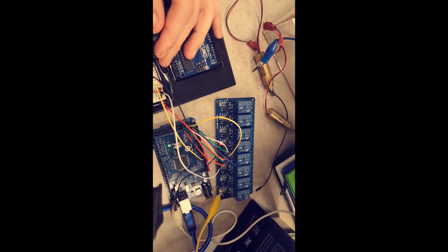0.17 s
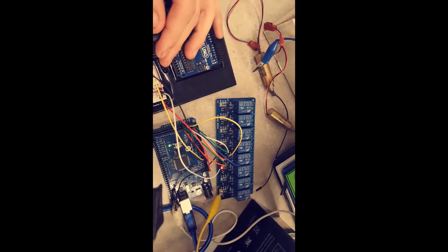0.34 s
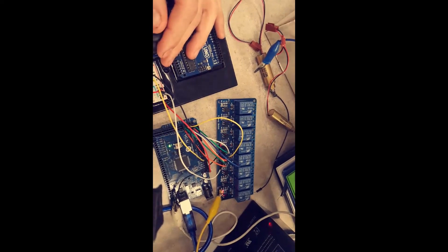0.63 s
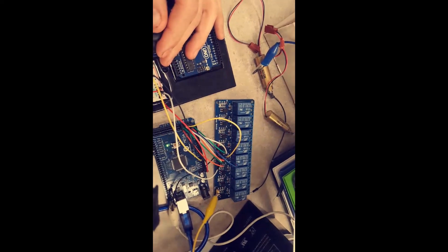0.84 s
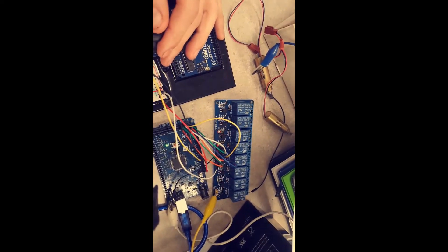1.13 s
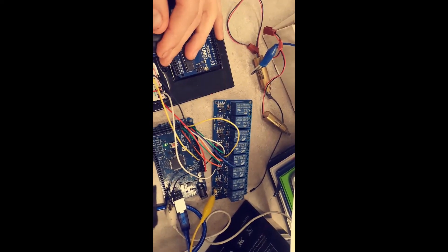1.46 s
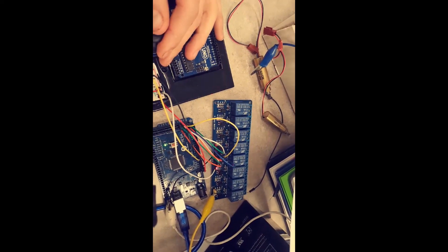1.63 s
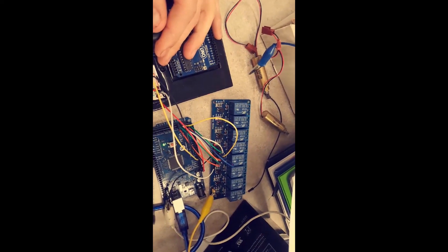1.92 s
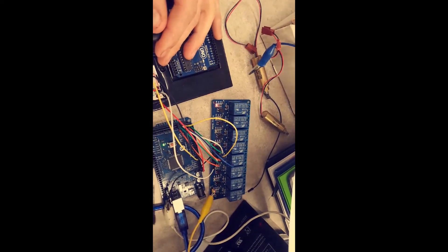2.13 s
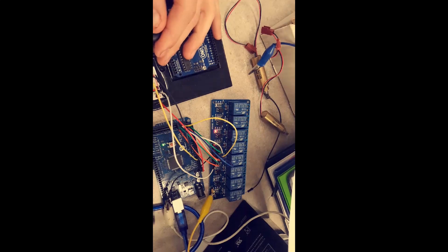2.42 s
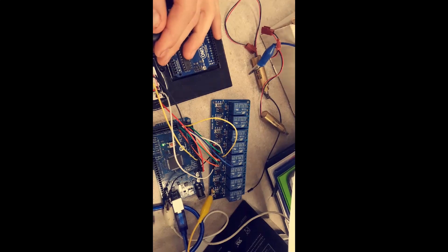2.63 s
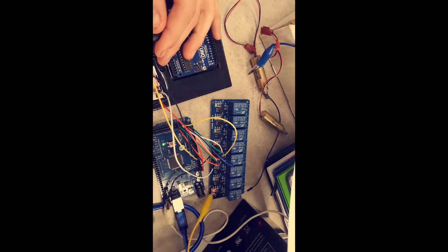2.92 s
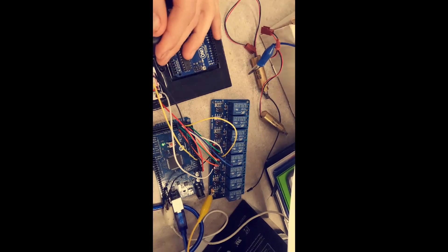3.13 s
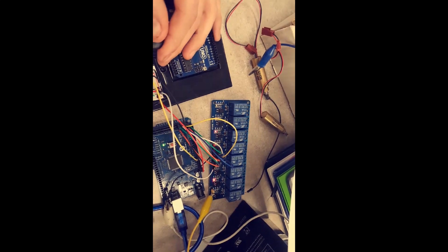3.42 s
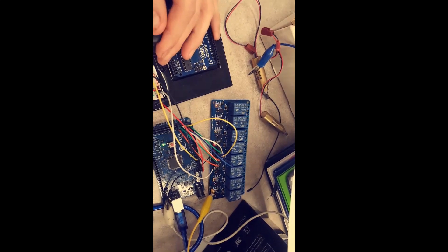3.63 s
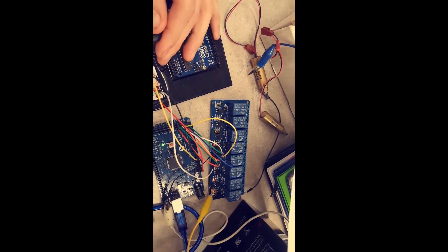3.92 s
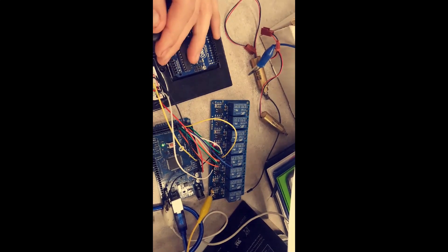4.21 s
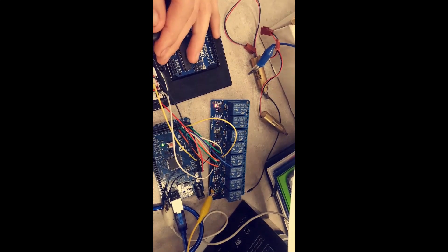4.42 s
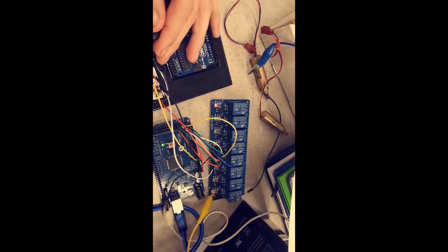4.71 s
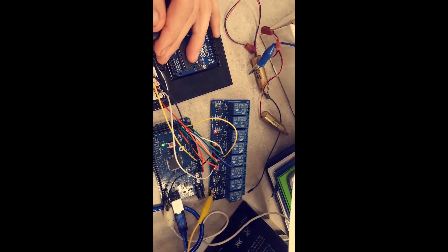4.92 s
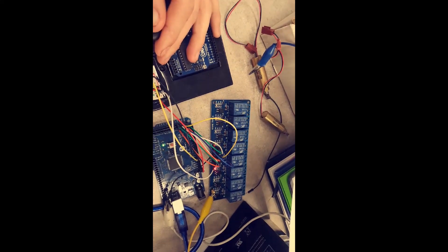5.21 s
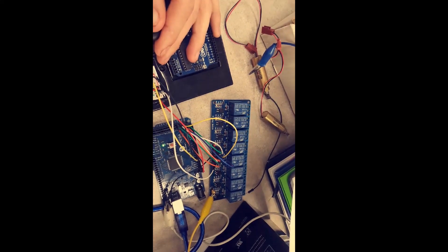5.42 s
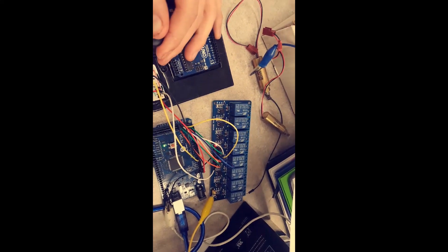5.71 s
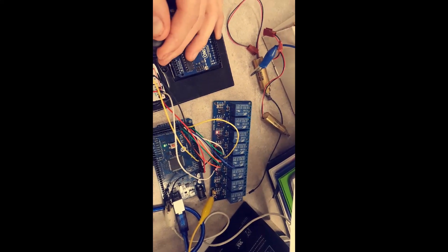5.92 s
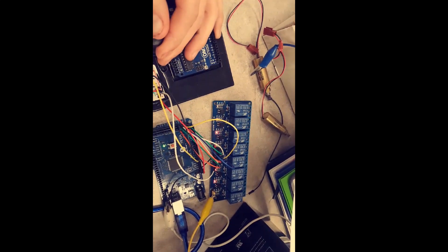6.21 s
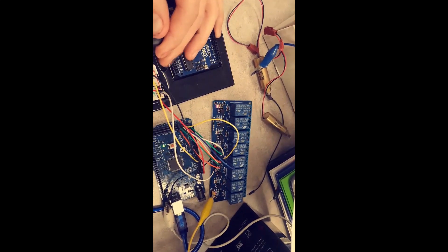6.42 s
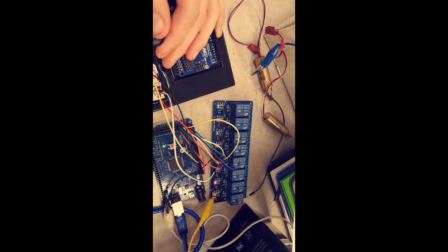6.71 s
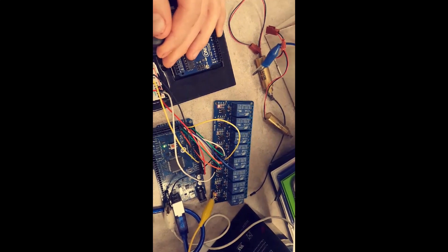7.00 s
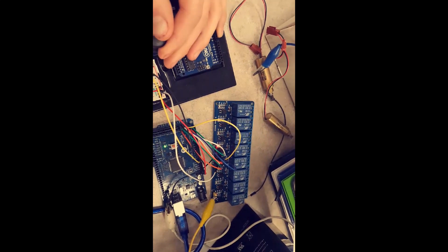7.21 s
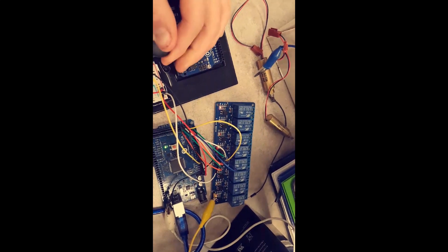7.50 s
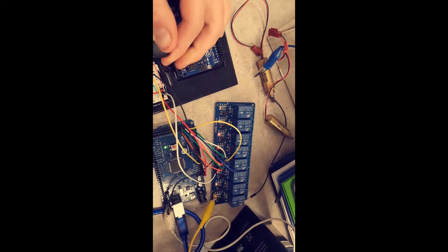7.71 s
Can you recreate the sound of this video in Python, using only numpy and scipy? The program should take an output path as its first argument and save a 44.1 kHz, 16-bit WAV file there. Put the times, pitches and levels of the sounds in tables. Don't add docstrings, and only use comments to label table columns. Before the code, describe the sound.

Crisp metallic relay clicks on a circuit board quicken in uneven steps into a rapid buzzing rattle, close up in a small room.

```python
import sys
import numpy as np
from scipy import signal
from scipy.fft import rfft, irfft
from scipy.io import wavfile
from scipy.ndimage import uniform_filter1d, minimum_filter1d

SR = 44100
rng = np.random.default_rng(int(sys.argv[2]) if len(sys.argv) > 2 else 0)


def store_wav(level_fs):
    pcm = np.round(np.clip(np.atleast_2d(level_fs), -1, 1) * 32767)
    wavfile.write(sys.argv[1], SR, pcm.T.astype(np.int16))


def rack_gain(trim_db):
    fader = np.asarray(trim_db, float)
    return 10 ** (fader / 20)


N = 346626

# number of sweeps, wait in ms.
DIAL = [(3, 45), (1, 24), (1, 21), (1, 27), (1, 25), (1, 22), (3, 9), (1, 12), (1, 13), (1, 16), (4, 20),
        (11, 9), (1, 7), (5, 5)]
# shift in ms, negative
PULL_SHIFT = [-.29, -.40, -.26, -.31, -.32, -.40, -.53, -.27]
# bounce delay in ms, bounce level in dB, crack left in dB, crack right in dB.
PULL_IN = [
    (2.24, -6, -27, -31),
    (2.09, -4.5, -26.5, -28),
    (1.42, -6, -28, -30.5),
    (2.11, -17, -28.5, -27.5),
    (2.02, -3, -27.5, -28),
    (0.7962, -4, -28.5, -36),
    (2.18, -4.5, -30, -31.5),
    (1.42, -8, -25, -29),
]
# frequency in Hz, level in dB, 60 dB decay time in s.
CASE_LEFT = [
    [(5300, -34, 0.031), (6260, -23, 0.0087), (6710, -11, 0.015), (6905, -12, 0.044), (7476, -23, 0.033)],
    [(4270, -24.5, 0.0077), (5840, -20.5, 0.0053), (6040, -26, 0.012), (6940, -11, 0.021),
     (7390, -9.5, 0.013)],
    [(4350, -42, 0.054), (5850, -19.5, 0.015), (6715, -6.5, 0.02), (7310, -6.5, 0.013), (8200, -20, 0.016)],
    [(5130, -18, 0.0046), (5760, -23.5, 0.0092), (6786, -10.5, 0.022), (7270, -10, 0.015),
     (8780, -25, 0.015)],
    [(4680, -25, 0.0096), (6160, -14, 0.0066), (6746, -11, 0.021), (7180, -22.5, 0.04), (8500, -27, 0.0046)],
    [(6170, -44, 0.0088), (5850, -31, 0.047), (6844, -5.5, 0.023), (7396, -6, 0.0055), (8470, -23, 0.012)],
    [(5280, -20.5, 0.0047), (6180, -17, 0.01), (6690, -12.5, 0.05), (7120, -14, 0.015), (7540, -18, 0.0096)],
    [(4630, -59, 0.012), (5400, -30, 0.015), (6720, -16, 0.031), (6970, -9.5, 0.014), (7900, -15, 0.014)],
]
# frequency in Hz,
# level in dB, 60 dB decay time in s.
CASE_RIGHT = [
    [(5032, -23, 0.027), (5995, -13.5, 0.053), (6590, -22, 0.044), (7720, -14.5, 0.0073),
     (7380, -10, 0.025)],
    [(4481, -24, 0.033), (5660, -7, 0.0055), (5933, -9, 0.027), (6400, -32, 0.012), (6400, -16.5, 0.0028)],
    [(5654, -4, 0.0097), (5907, -2.5, 0.015), (6430, -18, 0.018), (7190, -13, 0.0076), (7540, -26, 0.015)],
    [(4710, -11.5, 0.0045), (5745, 0.72, 0.0044), (5982, -3, 0.03), (7780, -13.5, 0.02), (7780, -23, 0.031)],
    [(5670, -5, 0.02), (5830, -11.5, 0.02), (5990, -9, 0.014), (6160, -3, 0.0039), (6920, -16.5, 0.013)],
    [(5664, -3, 0.015), (5918, -3, 0.02), (6540, -16.5, 0.029), (7300, -27.5, 0.0069), (8100, -35, 0.016)],
    [(4890, -15.5, 0.0054), (5785, -13.5, 0.028), (5870, -9, 0.0059), (6180, -6, 0.0093),
     (7480, -16, 0.0074)],
    [(4320, -14, 0.0046), (5753, -7, 0.017), (6195, -12.5, 0.02), (6500, -27, 0.0095), (7500, -30, 0.011)],
]
# frequency in Hz, density in dB per Hz.
CRACK_COLOUR = [(1200, -13), (2000, -21), (2800, -12.5), (3800, 4), (4600, -0.5), (5500, -17.5), (8300, 5),
                (9000, 1), (10300, -4), (11500, 1.5), (13300, -3), (15000, 5), (16300, -11)]
# frequency in Hz, level against left in dB.
RIGHT_SHADE = [(1200, 3), (2500, 3), (4500, 4), (8500, 0.5), (11500, 1.5), (13000, 2.5), (15000, -4)]
# left level in dB, right level in dB, change per bounce in dB.
DROP_OUT = [(-23.5, -15.5, 0), (-17.5, -12, -5.5), (-25, -16.5, -1), (-19.5, -15.5, -0.5),
            (-26.5, -16.5, 0), (-27.5, -16, 0.47), (-23, -14.5, -2), (-22.5, -18, -0.8)]
# frequency in Hz, density in dB per Hz.
RATTLE_LEFT = [(1500, -25), (3000, -19), (4200, -8.5), (5500, -6), (7000, 3.5), (8200, -8), (9500, -40),
               (12000, -21), (15500, -17)]
# frequency in Hz, density in dB per Hz.
RATTLE_RIGHT = [(1500, -25.5), (3000, -31), (4500, -13), (5900, 7), (7000, -11), (8500, -45), (10000, -54),
                (12000, -31), (15500, -34)]
# frequency in Hz, 60 dB decay time in s, right against left in dB.
BOARD_MODES = [(397, 0.11, -1.5), (815, 0.079, -9.5), (1191, 0.053, -2), (1966, 0.072, -22)]
BOARD_DRIVE = [(-51.5, -70, -56.5, -110), (-75, -47.5, -72, -78), (-63, -66, -53, -53.5),
               (-47, -49, -54, -73), (-49.5, -53, -60, -81), (-47.5, -49.5, -56, -57.5),
               (-53.5, -46.5, -67, -66), (-66, -53, -52, -63)]
WALL_ECHO = [-35, -23, -37, -33, -30, -40, -19, -23]
# frequency in Hz, density in dB per Hz.
FLOOR_COLOUR = [(25, -16), (70, 1), (105, 12), (145, -3), (195, 6), (280, -0.5), (390, 2), (480, -7.5),
                (1500, -13.5), (2600, -20.5), (6500, -1.5), (9200, -24), (11500, -21), (16000, -45)]
# frequency in Hz, likeness from 0 to 1.
FLOOR_LIKENESS = [(60, 0.94), (300, 1), (640, 0.21), (1400, 0.052)]
# start in seconds, level in dB.
MIC_POPS = [
    (1.1764, -17.5),
    (1.2229, -20),
    (1.2244, -11),
    (1.2389, -24),
    (2.7278, -21.5),
    (2.75, -22),
    (2.8863, -16.5),
    (4.4244, -9.5),
]
# frequency in Hz, threshold under the click in dB.
MASKED_BELOW = [(1200, -79), (2200, -51.5), (3200, -47), (4200, -70), (8000, -67), (9200, -40),
                (10300, -40), (11800, -47.5)]


def at_hz(points, hz):
    table_hz, values = np.transpose(points)
    return np.interp(np.log(hz), np.log(table_hz), values)


def bins_hz(size):
    return np.maximum(np.fft.rfftfreq(size, 1 / SR), 10)


def coloured(white, points):
    size = white.shape[-1]
    out = irfft(rfft(white) * rack_gain(at_hz(points, bins_hz(size))), size)
    return out / np.std(out)


def modes(rows, size):
    t = np.arange(size) / SR
    ringing = np.zeros(size)
    for k, (hz, db, t60) in enumerate(rows):
        ringing += (-1) ** k * rack_gain(db - 60 * t / t60) * np.sin(2 * np.pi * hz * t)
    return ringing


def strikes(times, gains):
    out = np.zeros(N + 40)
    at = np.asarray(times) * SR
    keep = (at >= 0) & (at < N)
    whole, part = at[keep].astype(int), at[keep] % 1
    for k in range(-8, 9):
        offset = k - part
        share = np.sinc(offset) * np.cos(np.pi * offset / 18) ** 2
        np.add.at(out, whole + k + 8, gains[keep] * share)
    return out[8:N + 8]


def conv(x, h):
    return signal.fftconvolve(x, h, axes=-1)[..., :N]


def schedule():
    loop_ms, clock_slow, first_pull_s = .168, 1.00011, -.6553
    sweeps, wait_ms = np.transpose(DIAL)
    steps = np.repeat(2 * wait_ms * clock_slow + loop_ms, 8 * sweeps) / 1000
    times = first_pull_s + np.cumsum(steps) - steps
    return times.reshape(-1, 8) + np.array(PULL_SHIFT) / 1000, steps.reshape(-1, 8)


def pull_in(k, times, luck):
    bounce_ms, bounce_db = PULL_IN[k][:2]
    blow = strikes(times, rack_gain(.7 * luck[:, 1]))
    bounce_at = times + bounce_ms / 1000 + 6e-6 * luck[:, 2]
    bounce = strikes(bounce_at, rack_gain(bounce_db + 1.26 * luck[:, 1]))
    echo = strikes(times + .022, rack_gain(WALL_ECHO[k] + luck[:, 2]))
    return blow, blow + bounce + echo


def drop_out(k, times, steps, luck):
    settle_db = DROP_OUT[k][2]
    force_db = -16.5 * np.exp(-steps / 0.019)
    gaps = rng.uniform(.0008, .0026, 5)
    chatter = np.cumsum(gaps) - gaps[0]
    drop_at = (times + steps / 2 + .009)[:, None] + chatter + 6e-5 * luck[:, 3:8]
    level_db = force_db[:, None] + settle_db * np.arange(5) + 2.4 * luck[:, 8:]
    return strikes(drop_at.ravel(), rack_gain(level_db).ravel())


def crackle(white):
    left, right = coloured(white, CRACK_COLOUR)
    return np.array([left, coloured(right, RIGHT_SHADE)])


def crack_burst(k, size):
    left_db, right_db = PULL_IN[k][2:]
    t = np.arange(size) / SR
    decay = rack_gain(-60 * t / 0.0092) + rack_gain(-28.0 - 60 * t / 0.015) + rack_gain(-31.5 - 60 * t / 0.24)
    rise = np.minimum(t / 0.00029, 1)
    return decay * rise * rack_gain(np.array([[left_db], [right_db]]) + 3)


def contact_rattle(k, size):
    left_db, right_db = DROP_OUT[k][:2]
    t = np.arange(size) / SR
    left, right = rng.standard_normal((2, size))
    noise = np.array([coloured(left, RATTLE_LEFT), coloured(right, RATTLE_RIGHT)])
    return noise * rack_gain(-60 * t / 0.016) * rack_gain(np.array([[left_db], [right_db]]) - 8.5)


def board_hum(k, size):
    hum = np.zeros((2, size))
    for (hz, t60, right_db), db in zip(BOARD_MODES, BOARD_DRIVE[k]):
        hum += modes([(hz, db, t60)], size) * rack_gain([[0], [right_db]])
    return hum


def relay(k, times, steps, grit, size=4096):
    luck = rng.standard_normal((len(times), 13))
    times = times + 1.5e-5 * luck[:, 0]
    blow, pull = pull_in(k, times, luck)
    drop = drop_out(k, times, steps, luck)
    burst = crack_burst(k, size)
    case = np.array([modes(CASE_LEFT[k], size), modes(CASE_RIGHT[k], size)])
    click = case + crackle(rng.standard_normal((2, size))) * burst
    pulled = conv(pull[None], click)
    scratch = rack_gain(-3) * grit * conv(pull[None], burst)
    dropped = conv(drop[None], contact_rattle(k, size))
    push = rack_gain(2.5) * blow - rack_gain(-4) * drop
    return pulled + scratch + dropped + conv(push[None], board_hum(k, size))


def room(x):
    t = np.arange(SR // 2) / SR
    late = rack_gain(np.array([[-19], [-23]]) - 60 * t / 0.23)
    clutter = rack_gain(-20 - 60 * t / 0.048)
    wall = rack_gain([[-22], [-34]]) * np.exp(-((t - .024) / 0.002) ** 2)
    onset = np.clip((t - .003) / 0.0042, 0, 1)
    tail = rng.standard_normal((2, len(t))) * (late + clutter + wall) * onset / np.sqrt(SR / 100)
    return conv(x, tail)


def floor():
    mid, side = rng.standard_normal((2, N))
    alike = np.clip(at_hz(FLOOR_LIKENESS, bins_hz(N)), 0, 1)
    mid = irfft(rfft(mid) * np.sqrt(1 + alike), N)
    side = irfft(rfft(side) * np.sqrt(1 - alike), N)
    noise = coloured(np.array([mid + side, mid - side]), FLOOR_COLOUR)
    return rack_gain(-47.5) * noise * rack_gain([[-1.2], [1.2]])


def scene():
    times, steps = schedule()
    grit = crackle(rng.standard_normal((2, N)))
    clicks = sum(relay(k, times[:, k], steps[:, k], grit) for k in range(8))
    return clicks + room(clicks) + floor()


def butter(x, order, hz, kind="low"):
    return signal.sosfilt(signal.butter(order, hz, kind, fs=SR, output="sos"), x)


def overdriven(x):
    return x - butter(x ** 2, 2, 3000) * rack_gain([[-8], [-19]])


def pops():
    start_s, level_db = np.transpose(MIC_POPS)
    bias = np.cumsum(strikes(start_s, rack_gain(level_db)))
    return butter(bias, 2, 2200) * rack_gain([[0], [-30]])


def wind_guard(x):
    crossover_hz, bass_cut_db, start_s = 433, -9, 3.74
    bass = butter(butter(x, 2, crossover_hz), 2, crossover_hz)
    rest = butter(butter(x, 2, crossover_hz, "high"), 2, crossover_hz, "high")
    guarded = rest + rack_gain(bass_cut_db) * bass
    fade = np.clip((np.arange(N) / SR - start_s) * 50, 0, 1)
    return x + fade * (guarded - x)


def masking(x, size=256, count=4):
    hz, _, cells = signal.stft(x, SR, nperseg=size)
    power = np.abs(cells) ** 2
    total = power.sum(axis=1, keepdims=True)
    loudest = -minimum_filter1d(-total, size=7, axis=-1, origin=2)
    band = np.arange(len(hz)) // count
    group = np.arange(power.shape[2]) // 8
    level = uniform_filter1d(power, size=count, axis=1, origin=-(count // 2))[:, band * count]
    chance_db = 6.5 * rng.standard_normal((band[-1] + 1, group[-1] + 1))[band][:, group]
    limit_db = at_hz(MASKED_BELOW, np.maximum(hz[band * count], 10))[:, None] + chance_db
    keep = level > loudest * rack_gain(2 * limit_db)
    return signal.istft(cells * keep, SR, nperseg=size)[1][:, :N]


def top_cut(x):
    return signal.sosfilt(signal.butter(12, 16820, fs=SR, output="sos"), x)


def record(dry):
    x = overdriven(dry) + pops()
    x = butter(x, 2, 95, "high")
    x = np.clip(wind_guard(x), -1, 1)
    x = signal.sosfilt(signal.cheby2(10, 50, 16900, fs=SR, output="sos"), x)
    return top_cut(masking(x))


dry = scene()
out = record(dry)
store_wav(out)
```